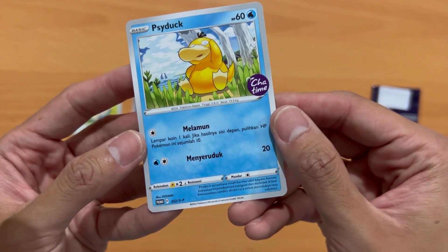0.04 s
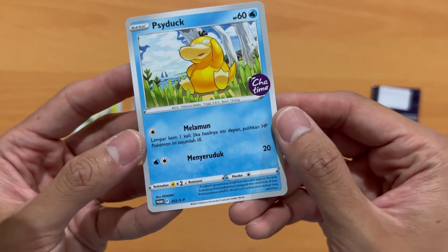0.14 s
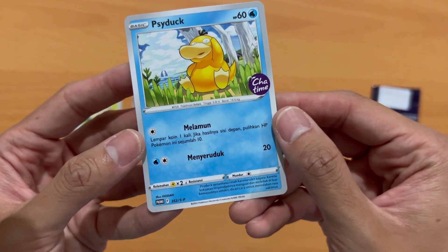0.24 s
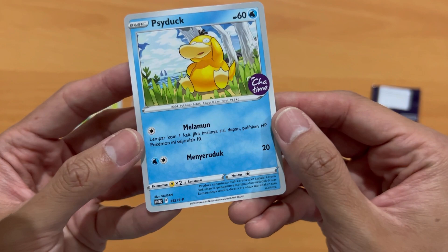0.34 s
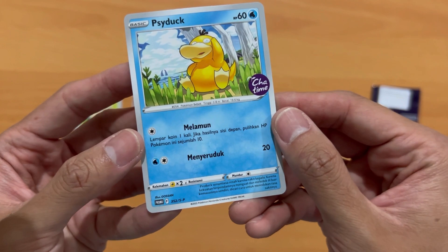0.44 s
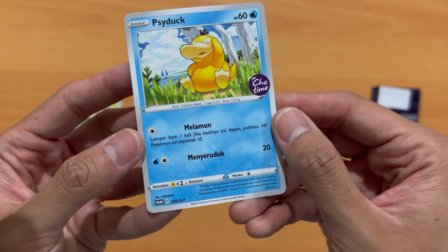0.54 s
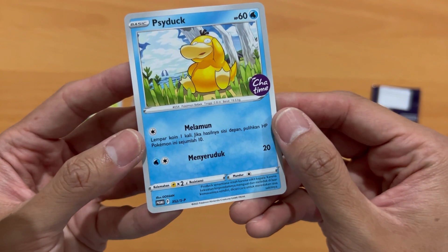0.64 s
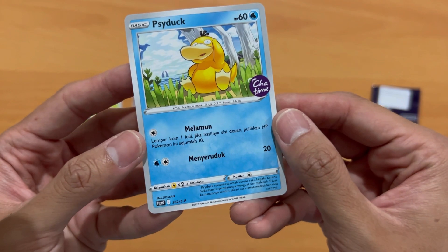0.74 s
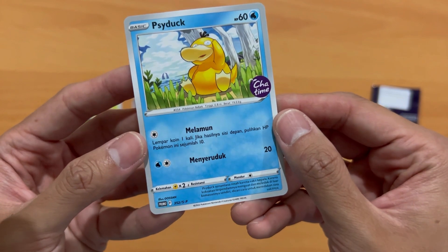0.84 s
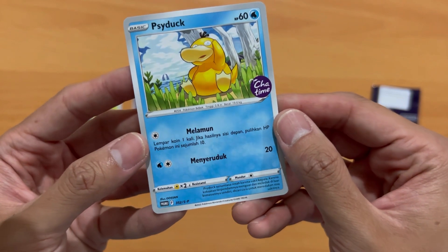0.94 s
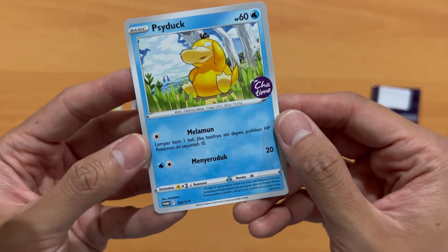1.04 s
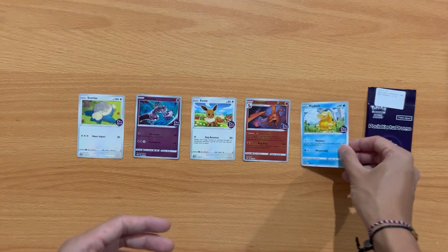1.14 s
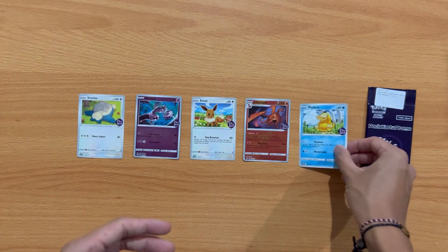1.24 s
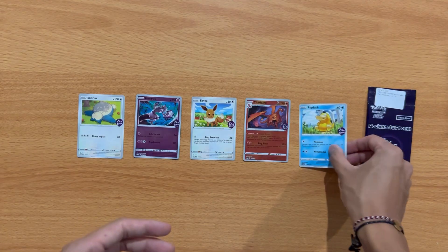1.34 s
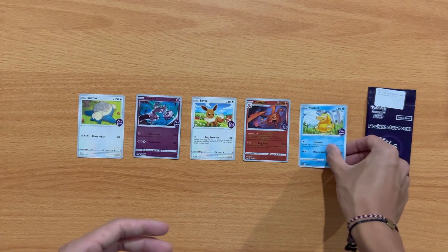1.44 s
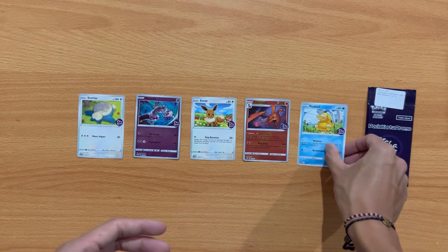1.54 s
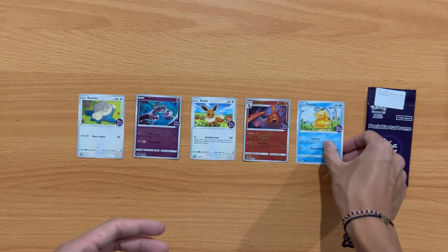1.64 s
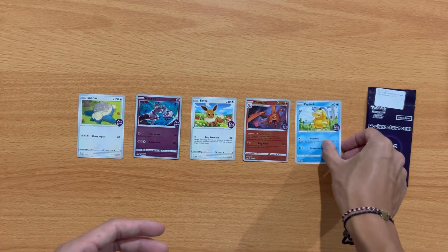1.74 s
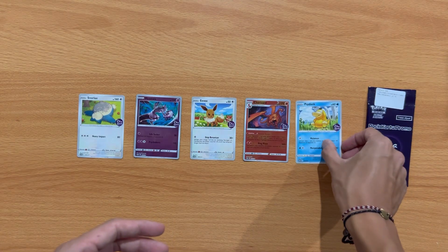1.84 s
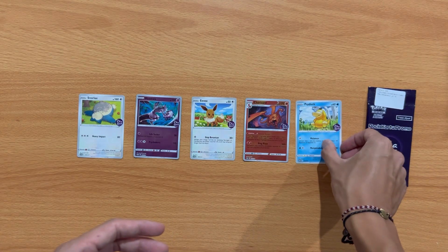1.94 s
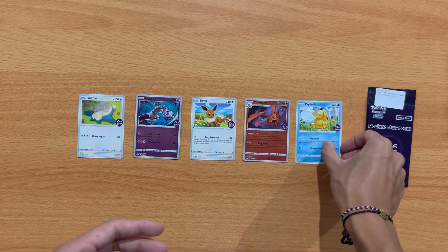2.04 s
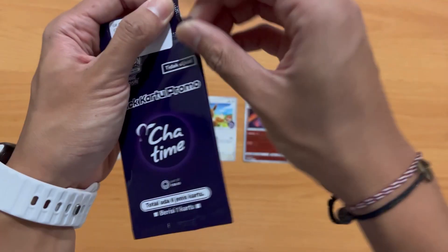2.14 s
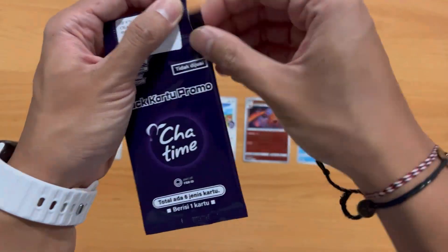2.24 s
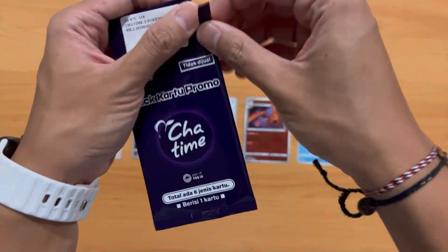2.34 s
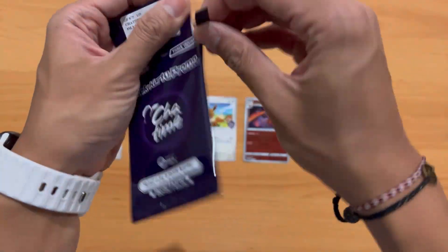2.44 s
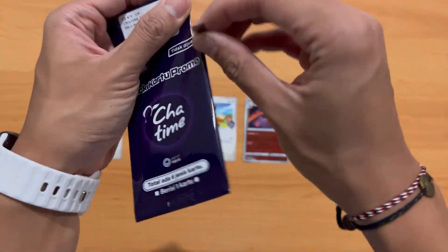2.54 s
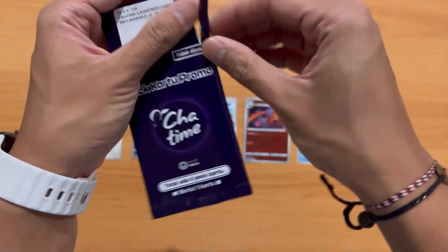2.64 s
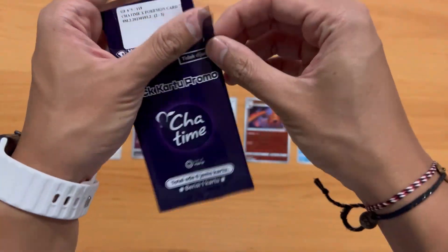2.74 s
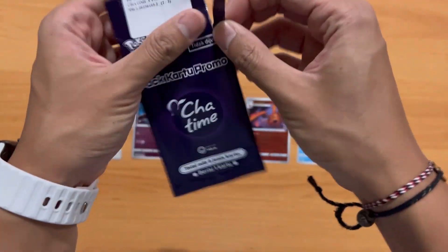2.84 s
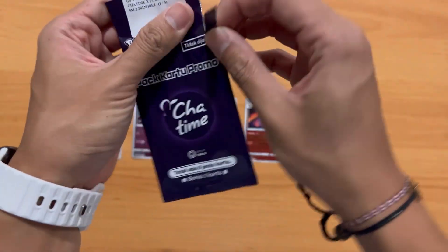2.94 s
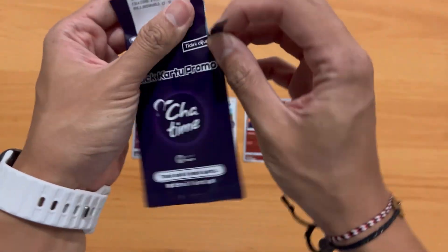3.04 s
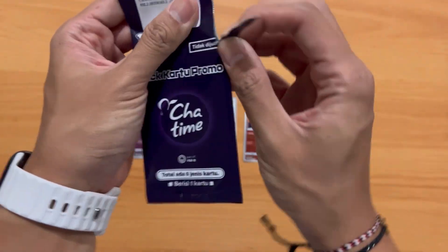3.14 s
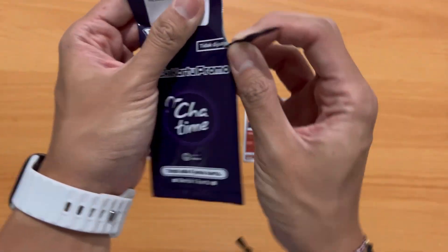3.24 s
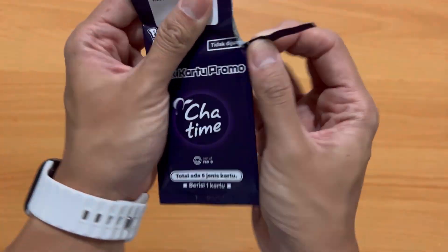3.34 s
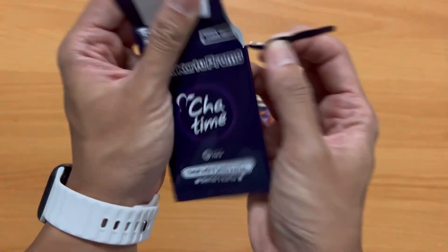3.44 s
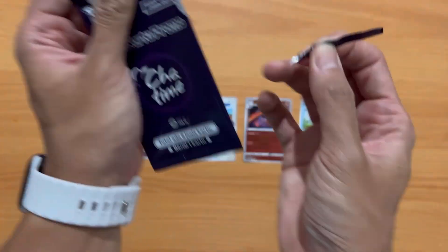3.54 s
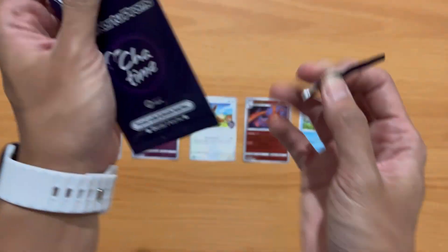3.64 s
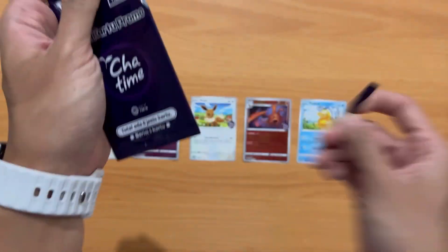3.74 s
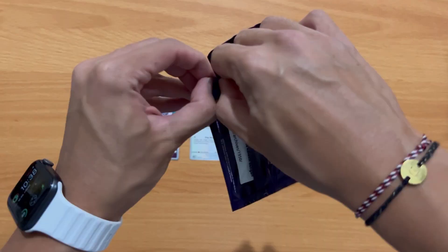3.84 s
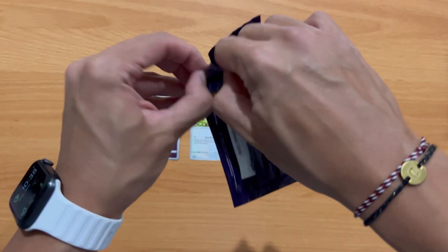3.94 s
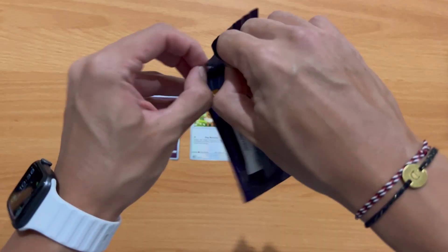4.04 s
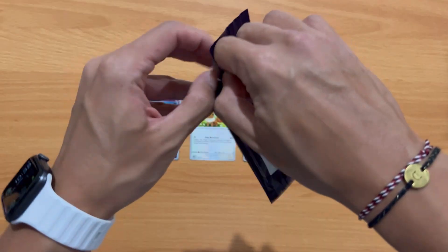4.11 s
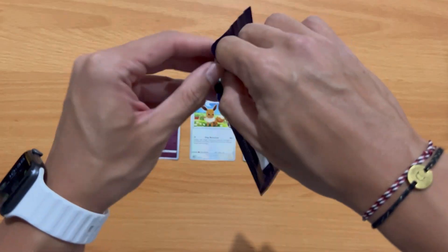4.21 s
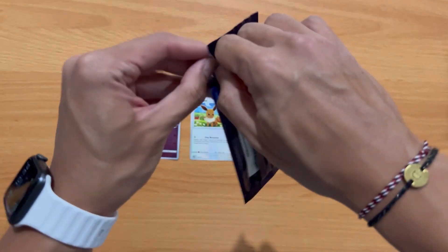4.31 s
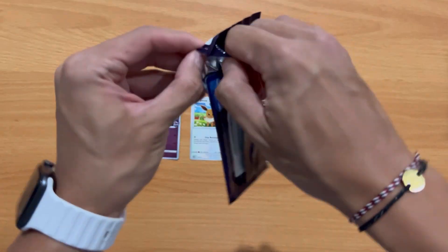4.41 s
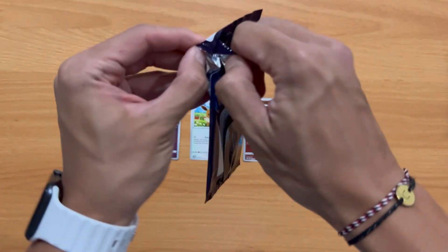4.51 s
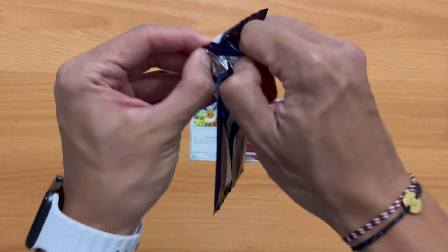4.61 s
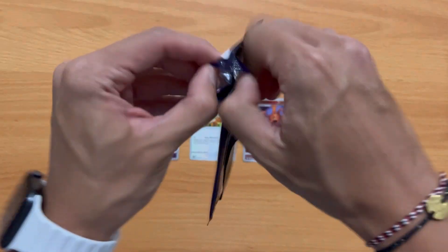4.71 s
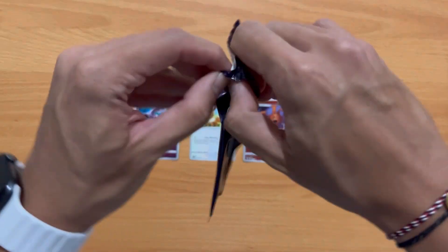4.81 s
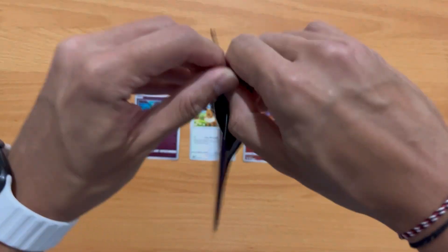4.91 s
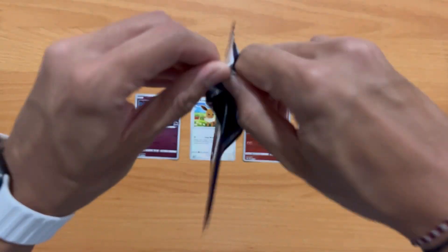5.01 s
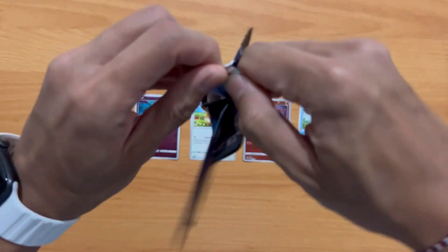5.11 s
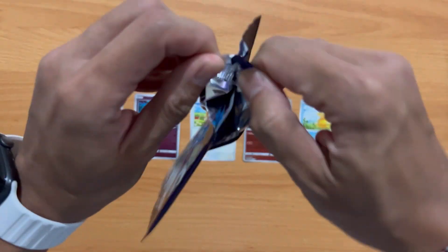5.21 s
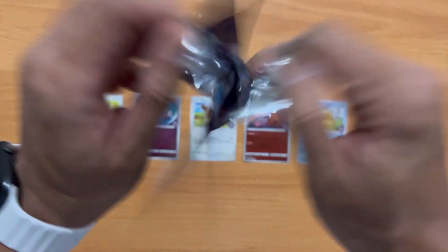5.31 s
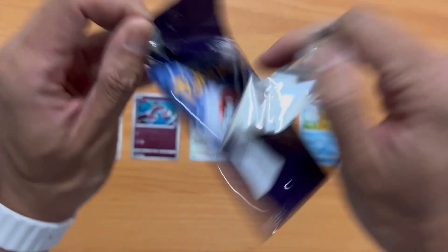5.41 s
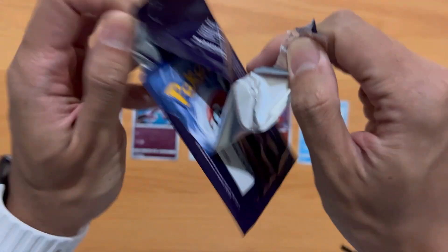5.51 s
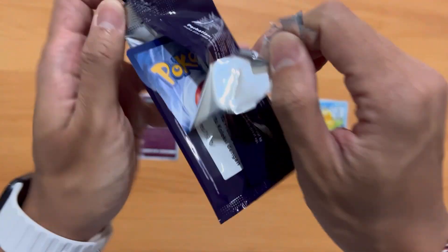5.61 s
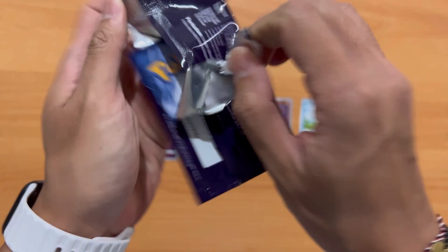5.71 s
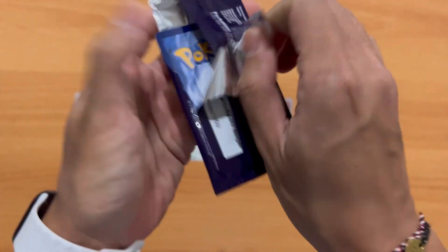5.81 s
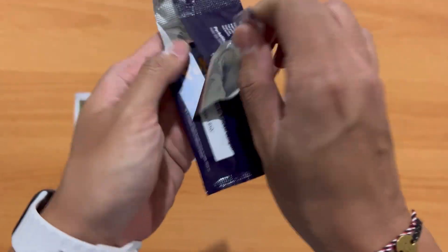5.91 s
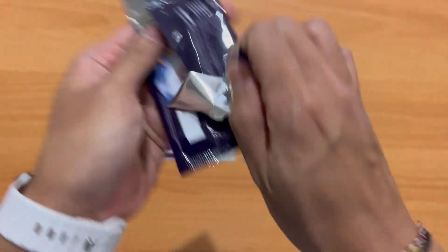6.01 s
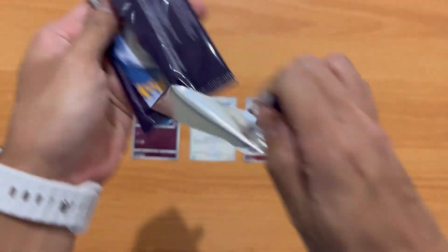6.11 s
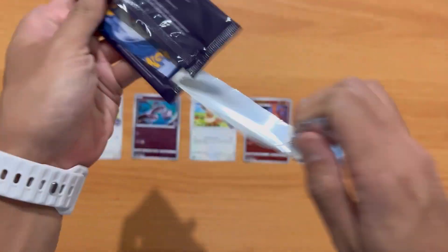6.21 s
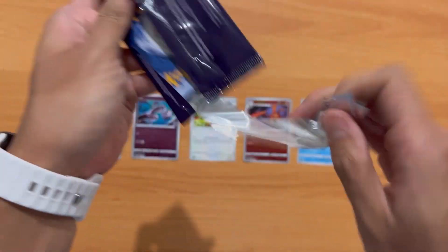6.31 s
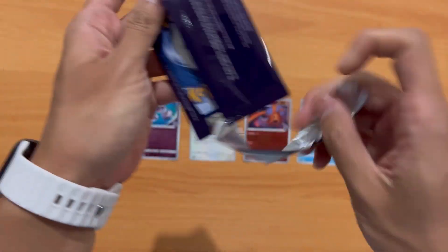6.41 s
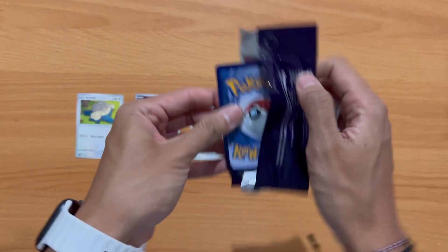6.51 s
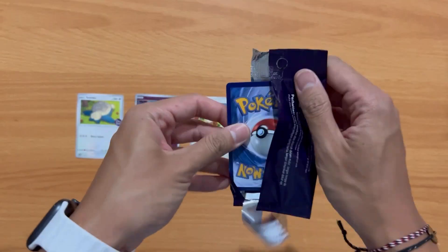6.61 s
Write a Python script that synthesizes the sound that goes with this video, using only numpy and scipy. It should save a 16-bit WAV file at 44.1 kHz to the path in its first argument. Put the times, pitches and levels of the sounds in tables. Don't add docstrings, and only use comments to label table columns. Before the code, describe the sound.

For the first 1.1 s there is only very faint, muffled road noise and slight hiss. The background drops even quieter as a card touches a desk at about 1.17 s, with a light fingertip rub, a barely audible cricket trill and a small bright click at 1.72 s. At 2.14 s close foil handling starts abruptly: irregular crisp snaps and fine crinkling until 3.2 s, one stronger at 3.04. A short tear crackles at 3.4 s, then a near-pause. From 3.9 s tighter, brighter crackles resume, with a low distant lorry boom around 3.3-4.2 s and a faint motorbike putter afterwards. At 5.28-5.35 s comes the loudest event, a dense sharp rip ringing off bare walls. Sparser crinkles follow, then strong peeling snaps at 5.9-6.2 s, especially near 6.08. Scattered ticks continue over rising traffic; a tiny dip at 6.53 s precedes a last bright snap at 6.65.

```python
import sys
import numpy as np
from scipy import signal
from scipy.fft import rfft, irfft, next_fast_len
from scipy.io import wavfile
from scipy.ndimage import uniform_filter1d, map_coordinates

SR = 44100
rng = np.random.default_rng(int(sys.argv[2]) if len(sys.argv) > 2 else 0)


def volts(x):
    e = np.asarray(x, float) / 20
    return 10 ** e


def persist_wave(psi):
    counts = np.round(np.clip(psi, -1, 1) * 32767).astype(np.int16)
    wavfile.write(sys.argv[1], SR, np.atleast_2d(counts).T)


N = 293706
SIDES = np.array([[1], [-1]])
CARD_START_S, CARD_END_S = 1.1, 2.11
SLAP_S = 1.715
CUT_S, CUT_FADE_S = 6.531, 0.0081

# [t/s, level/dB, nearness/dB]
ROAD = [(0, -62.5, -2.5), (1.09, -64.5, -4.5), (1.11, -71.5, 0.5), (1.6, -72, 1), (2.1, -71, -2),
        (2.13, -64, -0.5), (2.9, -61, 2), (3.25, -65.5, 1), (3.45, -60.5, 6), (3.86, -67.5, -1),
        (3.89, -56, 0), (4.6, -52, 7), (5.6, -51.5, 1.5), (6.2, -48, 7.5), (6.66, -56, 4)]
# [f/Hz, density/dB]
ROAD_RUMBLE = [(15, -57), (30, -10), (50, 14), (70, 5), (115, 1), (200, -72)]
ROAD_DRONE = [(80, -64), (130, -0.5), (350, -7.5), (520, -16.5), (900, -49), (1500, -110)]
ROAD_TYRES = [(350, -24), (560, -5.5), (800, -6), (1000, -4), (1350, 0), (1900, -9), (2600, -17.5),
              (3500, -31)]
# [f/Hz, density/dB]
MICROPHONE_HISS = [(2000, -28), (3500, -4.5), (8000, -9.5), (12500, -10.5), (14200, -44)]
# [f/Hz, left phase lead/rad]
ROAD_LEAD = [(200, 0.03), (1200, -2.5), (7000, 1.2)]

# [t/s, peak level/dB, panel f/Hz, edge over panel/dB]
CARD_TICKS = [
    (1.165, -58, 2190, -33),
    (1.53, -64, 4400, -30),
    (1.717, -43, 5670, -10),
]
# [f/Hz, density/dB]
CARD_HISS = [(3800, -49), (4900, -7), (5900, 6), (7000, -8), (8500, -6), (12000, -19), (16000, -12)]
FINGER_RUB = [(900, -50), (1500, -9), (2200, 1), (3200, -10), (5000, -17), (9000, -18.5)]
CARD_AIR = [(9000, -58), (10500, -6), (13500, 9), (14500, -40)]

# [t/s, hold/s, level/dB]
CRICKET_PHRASES = [
    (1.14, .12, -84),
    (1.47, 0.3, -81.5),
    (2.04, 0.046, -91),
]
# [f/Hz, density/dB]
CRICKET_SONG = [(3400, -56), (3900, -26), (4150, -19), (4195, -3), (4240, -18), (4800, -30.0), (5100, -39.0)]

# [t/s, peak level/dB, panel f/Hz,
# edge over panel/dB]
FILM_SNAPS = [(2.1364, -28.5, 1730, -40), (2.1433, -34.5, 2440, -33), (2.1793, -22.5, 1380, -13),
              (2.1887, -30, 3470, 0), (2.1971, -28, 2900, -23), (2.2108, -25.5, 2700, -16),
              (2.2181, -23.5, 1780, -5), (2.3769, -22, 1680, -14), (2.4134, -22.5, 2700, 2),
              (2.4376, -21, 3470, 7.5), (2.461, -30, 1980, -18), (2.4822, -29, 1730, 4),
              (2.5015, -29.5, 1370, -35), (2.5612, -35.5, 7600, 21.5), (2.6, -27.5, 2020, -33),
              (2.6188, -34.5, 1810, 6), (2.6526, -27.5, 1770, -45), (2.7069, -31.5, 1570, 7),
              (2.7346, -25.5, 1570, 7), (2.8159, -39, 2360, -40), (2.8468, -33, 3930, -30),
              (2.8549, -29.5, 8400, -8), (2.9525, -27.5, 4350, -30), (2.9849, -29, 1750, -28),
              (3.0395, -17, 2650, 5.5), (3.098, -36.5, 2970, 22), (3.118, -39, 7360, 13),
              (3.1289, -37, 7560, 16), (3.1454, -29.5, 7600, -1), (3.1515, -25.5, 7400, 13.5),
              (3.309, -37, 1290, -29), (3.358, -35, 1880, -40), (3.414, -17, 8100, 9.5),
               (3.4324, -17.5, 8700, 9.5), (3.4688, -17.5, 880, -6), (3.476, -21, 1460, -15),
               (3.687, -37, 2180, 8), (3.9027, -32, 2930, 17), (3.9203, -22, 3350, 22),
               (3.94, -13, 3700, 6), (3.9644, -32, 2890, 12), (4.0723, -19.5, 1860, 2),
               (4.0831, -18, 3540, 5.5), (4.1334, -28, 2050, 2), (4.2996, -23, 8360, 14.5),
               (4.314, -39, 6800, 35.5), (4.334, -24.5, 4070, 18), (4.3527, -22, 3530, 12),
               (4.362, -21, 3580, 8), (4.4032, -35.5, 3710, 24.5), (4.4532, -36, 3680, 18),
               (4.466, -18.5, 7455, 5), (4.4746, -28, 3100, 12),
              (4.5744, -32, 1450, 12), (4.5811, -26.5, 8200, 17.5), (4.6616, -25, 2900, 1),
               (4.6705, -22.5, 2650, -30), (4.6769, -22, 3630, -16), (4.6912, -36.5, 2650, 20.5),
               (4.7127, -16.5, 9250, -10), (4.793, -41, 7670, 25), (4.831, -17, 9000, -10),
               (4.906, -29, 3040, 2), (4.9323, -29, 7580, 14), (4.949, -30.5, 7510, 11),
               (5.0447, -49, 7690, 32.5), (5.0566, -54, 5770, 28), (5.1046, -24, 4600, -5),
               (5.115, -22.5, 1360, 3), (5.1345, -23.5, 8040, 13), (5.1737, -30, 8440, 24),
               (5.194, -22.5, 3320, -34), (5.218, -44, 3210, 24),
              (5.281, -14.5, 4300, 5), (5.285, -11.5, 3500, -7), (5.294, -5, 2840, -10),
             (5.304, -6, 2440, 5), (5.3148, -0.5, 8900, -18), (5.324, -6, 4330, -4),
             (5.328, -4.5, 3040, -11), (5.331, -9, 2680, 4), (5.36, -27, 3450, -12),
             (5.4435, -18, 1810, -2), (5.604, -34, 7300, 7), (5.631, -35, 3166, 14), (5.646, -30, 3260, 6),
             (5.6841, -26.5, 4690, 2), (5.713, -32, 4990, -22), (5.759, -31, 8200, -3),
             (5.8076, -35, 8000, 3),
              (5.883, -20.5, 7910, 7), (5.9217, -19.5, 3006, -7), (5.929, -20.5, 3800, -12),
              (6.021, -15.5, 5970, 0), (6.026, -21, 3360, -13), (6.0493, -10.5, 3560, -1),
              (6.0581, -14, 2940, 3), (6.066, -10.5, 4540, -17), (6.073, -13, 3760, 10),
              (6.085, -4.5, 6700, -12), (6.126, -9, 2770, -5), (6.13, -16.5, 8400, 14.5),
              (6.1655, -17.5, 2340, -1), (6.192, -19, 1900, -22), (6.1991, -27.5, 8200, 18),
              (6.2072, -14.5, 8500, 6.5), (6.3148, -27, 4900, 1), (6.3425, -22, 7460, 0),
              (6.3897, -29, 1510, -19), (6.44, -20.5, 5220, -3), (6.473, -26.5, 8200, -17),
              (6.564, -24, 1694, -16), (6.6537, -12.5, 1800, 11.5)]
# [t/s, peak level/dB, panel f/Hz,
# edge over panel/dB]
LESSER_CREASES = [(2.342, -50, 1720, 0), (2.3489, -46, 2800, -8), (2.3875, -33, 1380, -16),
                  (2.4463, -54, 5600, 21), (2.447, -43, 7800, 24), (2.6765, -40, 1810, -25),
                  (2.6819, -53, 1680, -28), (2.7393, -33.5, 1670, -16), (2.8846, -43.5, 2720, -22),
                  (2.9073, -45, 1810, -22), (2.9993, -34.5, 810, -21), (3.0202, -54, 5680, 13),
                  (3.1351, -43, 7410, 16), (3.1786, -41, 8230, 5), (3.3401, -42, 710, -13),
                  (3.442, -36, 1210, -7), (3.452, -41, 800, -21), (3.458, -34, 700, -22),
                  (3.4735, -23.5, 850, -10), (3.525, -43.5, 2500, -6), (3.545, -47, 2470, -20),
                  (3.6649, -44, 850, -29), (3.682, -41.5, 2640, -1), (3.6983, -48, 7800, 15),
                  (3.7533, -56, 7760, 18), (3.8659, -41.5, 2180, 9), (3.878, -37, 2560, -6),
                  (3.9257, -23, 3010, -5), (3.976, -25.5, 3800, -3), (4.068, -30, 2530, -11),
                   (4.273, -47, 7800, 12), (4.3289, -26.5, 4570, 16), (4.3703, -21.5, 3350, -1),
                   (4.4257, -40, 4910, 4), (4.4799, -33.5, 3570, 1), (4.5482, -30, 1040, -7),
                   (4.6065, -36, 5700, -7), (4.8193, -32, 700, -9), (4.824, -30.5, 7500, -3),
                   (4.8545, -30.5, 7800, 7), (4.919, -33, 7600, 8), (5.0054, -39.5, 700, -29),
                   (5.09, -38, 705, -22), (5.1626, -28, 3730, 4), (5.261, -31, 665, -3),
                   (5.4315, -27, 2070, -18), (5.6718, -46, 1500, 0), (5.7068, -40, 710, -34),
                   (5.7194, -32, 700, -26), (5.862, -40, 695, 3), (6.078, -16, 2980, 3),
                   (6.108, -24, 1500, -15), (6.3094, -32, 8200, 8.5), (6.346, -38, 2980, 7),
                   (6.5472, -36, 7800, 0),
                  (3.051, -36, 1000, -7), (3.158, -38, 7500, 3), (3.168, -46, 7500, 6),
                 (3.187, -47, 7500, 13), (3.195, -49, 7500, 12), (5.54, -40, 7600, 11),
                 (5.573, -46, 7500, 16), (5.657, -33, 4393, 6), (6.319, -36, 2980, 12),
                 (6.328, -39, 3000, -1), (4.735, -36, 3000, 2), (4.743, -41, 3000, 4),
                 (4.965, -41.5, 7150, 12), (5.123, -32, 7040, 8), (5.154, -48, 7000, 10),
                 (5.185, -33, 7000, 10), (2.1747, -39, 1290, -25), (4.3353, -20.5, 4120, 8),
                 (4.457, -31, 3630, 14), (5.276, -24, 6500, 13), (5.2866, -13.5, 1990, -9),
                 (5.3008, -20, 3000, 4), (5.31, -17, 3540, 6), (5.334, -16, 3020, 1), (5.35, -17, 4000, -3),
                 (3.922, -20.5, 3000, 14), (3.9266, -27, 2000, 8), (3.935, -28.5, 3000, 15),
                 (4.0705, -37, 3080, 10), (5.306, -10.5, 2380, -9), (5.356, -26, 3000, -2)]
# [full grip t/s, hold/s, film level/dB, edge over film/dB]
GRIPS = [(2.142, 0.023, -55.5, -8), (2.383, 0.018, -49, -8), (2.624, 0.056, -58, -16),
         (2.82, 0.066, -57, -5.5), (3.113, 0.027, -71, -11), (3.436, 0.0079, -62, -10),
         (3.684, 0.21, -67, 3), (3.893, 0.01, -49, -4), (3.902, 0.016, -37.5, -9), (4.031, 0.12, -45, -10),
         (4.327, 0.053, -40.5, -4), (4.454, 0.23, -54.5, -22), (4.68, 0.033, -46.5, -9),
         (4.842, 0.018, -47, -9), (4.893, 0.17, -54.5, -20), (5.156, 0.021, -44.5, -2),
         (5.299, 0.0091, -28, -10), (5.472, 0.15, -47.5, -8), (5.637, 0.014, -45, -7.5),
         (5.92, 0.063, -44.5, -7), (6.044, 0.027, -45, 5), (6.312, 0.022, -47.5, -4),
         (6.418, 0.13, -49, -3.5), (6.655, .01, -40.5, -2)]
# [f/Hz, density/dB]
FILM_CRACKLE = [(250, -82), (400, 3.5), (600, -17.5), (900, -8), (1500, -4), (7500, -7), (8800, -2.5),
                (10500, -64)]
RIM_CRACKLE = [(8000, -58), (9500, -8.0), (17000, -17.0)]
# [t/s, peak
# level/dB, f/Hz]
LOW_KNOCKS = [(2.201, -38, 121), (2.503, -35.5, 355), (3.445, -40, 493), (3.464, -34.5, 415),
              (3.474, -30.5, 175), (3.483, -30, 414), (3.455, -38, 348), (3.939, -32.5, 297),
              (5.261, -36, 249.4), (5.311, -24, 130), (5.334, -17.5, 318), (6.167, -21, 324),
              (6.565, -31, 468),
              (1.47, -63, 584), (1.73, -66, 770), (2.418, -38.5, 390), (2.601, -42, 370), (2.622, -41.5, 360),
            (2.857, -43, 400), (3.0, -43.5, 493), (3.098, -43, 338), (3.359, -40.5, 720),
            (3.413, -35.5, 820), (3.866, -46.5, 750), (3.688, -47, 337), (4.071, -33.5, 830),
            (4.299, -37, 476), (4.371, -39, 945), (4.448, -44, 1120), (4.711, -36, 910), (4.833, -37, 350),
            (5.289, -17.5, 888), (6.067, -25, 901), (6.085, -20.5, 804), (6.128, -24.5, 900),
            (6.473, -32, 860)]
# [f/Hz, decay time T60/s]
ROOM_DECAY = [(200, 0.99), (1500, 0.67), (6000, 1), (15000, 0.32)]

# [t/s, f/Hz, level/dB]
LORRY_SWELLS = [
    (3.26, 54.8, -46.5),
    (3.56, 51.75, -43.5),
    (3.78, 52.24, -45.5),
    (4.2, 49.1, -42),
]
# [t/s, firing f/Hz, level/dB, even over odd orders/dB]
BIKE_APPROACH = [
    (3.882, 31.46, -59, 1),
    (4.1, 31.65, -54.5, -2),
    (4.3, 31.88, -60, 2.5),
    (4.599, 32.3, -61, -1),
    (4.95, 32.94, -60, 19),
    (5.5, 34.07, -58, -6),
    (6.3, 34.6, -52.5, -13),
    (6.53, 35.27, -52.5, -1),
    (6.56, 32.7, -49, 1),
    (6.66, 34.2, -52, 6),
]
# [order of the firing rate, level/dB]
EXHAUST_ORDERS = [(2, 1), (3, -21), (4, -46), (5, 2.5), (6, 6), (7, 0.5), (8, -12), (9, -5), (10, -10.5)]

# [f/Hz, left over right/dB]
BODY_SHADE = [(300, -0.5), (1000, -3.5), (3000, -5), (6000, -5.5), (12000, -2)]
# [f/Hz, left phase lead/rad]
BODY_LEAD = [(700, 0.32), (3500, -0.83), (4800, -1.2), (5600, 1), (7000, -0.28)]
# [f/Hz, share]
DIFFERENCE_KEPT = [(3000, 1), (5000, 1.4), (9000, .4), (12000, .3)]
# [f/Hz, gain/dB]
PORT_GAIN = [(6000, -1.5), (8600, -5), (9500, 0.5), (10600, -3.5), (11900, 5), (13200, 1.5), (14500, 1.5),
             (15800, 1.5), (16250, -24), (17100, -57)]
# [f/Hz, phase/rad]
PORT_TWIST = [(6900, .1), (8000, 1), (8900, 2.9), (9750, 3.5), (11800, 6.28), (14350, 9.42), (15850, 11.1)]


def unit(x):
    return x / np.sqrt(np.mean(x ** 2) + 1e-20)


def along(points, hz):
    f, v = np.transpose(points)
    return np.interp(np.log(hz + 1), np.log(f + 1), v)


def curves(rows):
    s, *cols = np.transpose(rows)
    return [np.interp(np.arange(N) / SR, s, c) for c in cols]


def during(start_s, end_s):
    from_middle = abs(np.arange(N) / SR - (start_s + end_s) / 2)
    return uniform_filter1d(1. * (from_middle < (end_s - start_s) / 2), size=200)


def swells(rows, rise_db_per_s, fade_db_per_s):
    t = np.arange(0, N + 64, 64) / SR
    s, hold, db = np.transpose(rows)[..., None]
    level = db - rise_db_per_s * (s - t).clip(0) - fade_db_per_s * (t - s - abs(hold)).clip(0)
    return np.interp(np.arange(N) / SR, t, np.sqrt((volts(level) ** 2).sum(0)))


def wobble(rate):
    knots = rng.standard_normal(int(N * rate / SR) + 4)
    return map_coordinates(knots, [np.arange(N) * rate / SR])


def filtered(x, response):
    m = next_fast_len(N + 8192)
    return irfft(rfft(x, m) * response(np.fft.rfftfreq(m, 1 / SR)), m)[..., :N]


def pair(alike):
    a, b = rng.standard_normal((2, N))
    u = np.arccos(np.clip(alike, 0, 1)) / 2
    return np.array([np.cos(u) * a + np.sin(u) * b, np.cos(u) * a - np.sin(u) * b])


def rush(spectrum, white):
    return unit(filtered(white, lambda hz: volts(along(spectrum, hz))))


def traffic():
    drone_db, near_db = curves(ROAD)
    rumble_db = drone_db + 8 - near_db
    tyre_db = drone_db - 5 + 0.03 * near_db
    rumble = volts(rumble_db + SIDES + wobble(5)) * rush(ROAD_RUMBLE, pair(.9))
    drone = volts(drone_db + wobble(6)) * rush(ROAD_DRONE, pair(.82))
    tyres = volts(tyre_db + .5 * wobble(4)) * rush(ROAD_TYRES + [(6000, -90)], pair(.6))
    hiss = volts(-86.0) * rush(MICROPHONE_HISS, pair(0.23))
    lead = lambda hz: np.exp(.5j * along(ROAD_LEAD, hz) * SIDES)
    return filtered(rumble + drone + tyres, lead) + hiss


def snaps(table, width_s, peak_db, pan_db, thud_db):
    s, db, panel_hz, edge_db = np.transpose(table)[..., None]
    size, lead, alike = 768, 192, .97
    t = (np.arange(size) - lead) / SR + 0.000566
    hz = np.fft.rfftfreq(size, 1 / SR)
    draw = rng.standard_normal((len(s), 3 * size + 2))

    width = width_s * np.exp(.3 * draw[:, -1:] - .02 * edge_db - .2)
    lumps = uniform_filter1d(rng.standard_normal((len(s), size)), size=40) * np.sqrt(40)
    rattle = volts(5 * lumps) * volts(-60 * abs(t) / np.where(t < 0, .002, .025))
    shape = np.exp(-abs(t) / np.where(t < 0, 0.36 * width, width)) + 0.12 * rattle
    shape = shape + 1.2 * np.exp(-abs(t) / 0.00012)

    shared = draw[:, None, :size]
    own = draw[:, size:3 * size].reshape(-1, 2, size)
    burst = rfft((alike * shared + np.sqrt(1 - alike ** 2) * own) * shape[:, None])
    even = np.sqrt(np.mean(abs(burst[:, :1]) ** 2, axis=2, keepdims=True))
    even = even * np.exp(-2j * np.pi * hz * lead / SR)
    burst = np.concatenate([burst, even], axis=1)

    octaves = np.log2((hz + 50) / panel_hz)
    panel = volts(np.clip(peak_db, 0, 12) * np.exp(-(octaves / 0.31) ** 2))
    panel = panel / np.sqrt(1 + (1000 / (hz + 1)) ** 4 + (hz / 9000) ** 8)
    thud = 1 / np.sqrt(1 + (300 / (hz + 1)) ** 4 + (hz / 1200) ** 6)
    edge = 1 / np.sqrt(1 + (9000 / (hz + 1)) ** 8)
    peak = lambda colour: abs(irfft(burst[:, :2].mean(1) * colour)).max(1, keepdims=True)
    panel, thud, edge = panel / peak(panel), thud / peak(thud), edge / peak(edge)
    late = np.exp(-2j * np.pi * hz * 0.0011)
    colour = panel + volts(edge_db - 3) * edge + volts(thud_db + 2 * draw[:, :1]) * thud * late
    burst = irfft(burst * colour[:, None]) * volts(db)[:, None]

    side_db = pan_db + 1.5 * draw[:, -2:-1]
    burst = burst * volts(np.stack([side_db, -side_db, 0 * side_db], axis=1) / 2)
    at = (np.round(s * SR).astype(int) + np.arange(size)).ravel()
    return np.array([np.bincount(at, burst[:, c].ravel(), N + 2 * size)[lead:N + lead] for c in range(3)])


def card():
    slap = swells([(SLAP_S, 0, -48.5)], rise_db_per_s=1402, fade_db_per_s=1100)
    echo = swells([(SLAP_S, 0, -63)], rise_db_per_s=1402, fade_db_per_s=97)
    finger = swells([(CARD_START_S, 0.18, -72)], rise_db_per_s=0, fade_db_per_s=53)
    hiss = (slap + echo + volts(-101) + volts(-25) * finger) * rush(CARD_HISS, pair(0.2))
    rub = finger * rush(FINGER_RUB, pair(0.28))
    air = volts(-99) * rush(CARD_AIR, pair(0.37))
    ticks = snaps(CARD_TICKS, width_s=0.0018, peak_db=22, pan_db=-13, thud_db=-43)[:2]
    return during(CARD_START_S, CARD_END_S) * (hiss + rub + air) + ticks


def cricket():
    pulse = 1 + 0.14 * np.sin(2 * np.pi * 40 * np.arange(N) / SR + 2 * wobble(6.2))
    song = rush(CRICKET_SONG, pair(0.1))
    phrases = swells(CRICKET_PHRASES, rise_db_per_s=150, fade_db_per_s=86)
    return during(CARD_START_S, CARD_END_S) * phrases * volts(7.5) * unit(pulse) * song


def crackle():
    film_strokes = [(s, hold, db) for s, hold, db, _ in GRIPS]
    rim_strokes = [(s, hold, db + edge) for s, hold, db, edge in GRIPS]
    film = swells(film_strokes, rise_db_per_s=791, fade_db_per_s=99)
    rim = swells(rim_strokes, rise_db_per_s=791, fade_db_per_s=149)
    grains = (rng.random(N) < 800 / SR) * volts(6 * rng.exponential(size=N).clip(0, 1.3))
    spikes = np.convolve(grains, np.hanning(40), "same")
    clumps = volts(3 * wobble(60) + 1.5 * wobble(200))
    rough = clumps * (1 + 1.2 * spikes) * pair(.6)
    edge = rush(RIM_CRACKLE, rough)
    return film * rush(FILM_CRACKLE, rough) + rim * edge


def knocks():
    out, t = np.zeros(N + SR), np.arange(SR // 10) / SR
    attack = 1 - np.exp(-t / 0.00029)
    for s, db, hz in LOW_KNOCKS:
        decay = volts(db - 60 * t * np.sqrt(hz) / 0.46)
        out[round(s * SR):][:len(t)] += decay * np.sin(2 * np.pi * hz * t) * attack
    return out[:N]


def room(x):
    out, step = np.zeros((2, N + 2 * SR)), round(.45 * SR)
    for a in range(0, N, step):
        hz, t, z = signal.stft(rng.standard_normal((2, SR * 3 // 4)), SR, nperseg=256)
        decay = volts(-60 * t / along(ROOM_DECAY, hz)[:, None])
        tail = signal.istft(z * decay, SR, nperseg=256)[1]
        wet = signal.fftconvolve(x[None, a:a + step], tail / np.linalg.norm(tail[0]), axes=1)
        out[:, a + 200:a + 200 + wet.shape[1]] += wet
    return out[:, :N]


def lorry():
    hz, _ = curves(LORRY_SWELLS)
    strokes = [(s, 0, db) for s, _, db in LORRY_SWELLS]
    boom = swells(strokes, rise_db_per_s=55, fade_db_per_s=55)
    return boom * np.sin(2 * np.pi * np.cumsum(hz + wobble(6.06)) / SR)


def motorbike():
    firing_hz, level_db, even_lift_db = curves(BIKE_APPROACH)
    even_db, odd_db = level_db + even_lift_db / 2, level_db - even_lift_db / 2
    turn = 2 * np.pi * np.cumsum(firing_hz) / SR

    def order(k, db):
        swell = volts(db + (even_db, odd_db)[round(k) % 2] + 0.6 * wobble(3.08) + 1.7 * wobble(11))
        phase = .6 * wobble(5) + rng.uniform(0, 2 * np.pi) + .35 * rng.standard_normal((2, 1))
        return swell * np.sin(round(k) * turn + phase)

    heard = during(BIKE_APPROACH[0][0], BIKE_APPROACH[-1][0])
    return heard * volts(1.5) * sum(order(k, db) for k, db in EXHAUST_ORDERS)


def scene():
    gestures = FILM_SNAPS
    creases = LESSER_CREASES
    *big, big_far = snaps(gestures, width_s=0.0013, peak_db=10.5, pan_db=3.0, thud_db=-19.5)
    bed = crackle() + knocks()
    *small, small_far = snaps(creases, width_s=0.0041, peak_db=19.5, pan_db=3.0, thud_db=-20)
    body = lambda hz: volts(along(BODY_SHADE, hz) * SIDES / 2) * np.exp(.5j * along(BODY_LEAD, hz) * SIDES)
    near = filtered(bed + big + small, body)
    echo = volts(-11.5) * room(bed.mean(0) + big_far + small_far)
    return near + echo + card() + traffic() + lorry() + motorbike() + cricket()


def roll_off(x):
    return signal.sosfilt(signal.butter(12, 17160, fs=SR, output="sos"), x)


def record(dry):
    left, right = dry / (1 + abs(dry / .95) ** 4) ** .25
    difference = filtered((left - right) / 2, lambda hz: along(DIFFERENCE_KEPT, hz))
    x = (left + right) / 2 + SIDES * difference
    x = filtered(x, lambda hz: volts(along(PORT_GAIN, hz)) * np.exp(.5j * along(PORT_TWIST, hz) * SIDES))
    x = x * np.clip(abs(np.arange(N) / SR - CUT_S) / CUT_FADE_S, .1, 1)
    return roll_off(x)


dry = scene()
out = record(dry)
persist_wave(out)
```